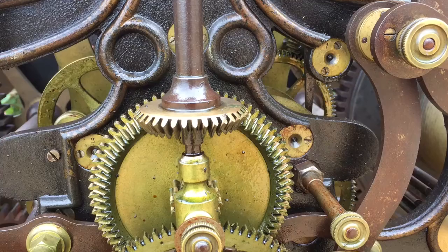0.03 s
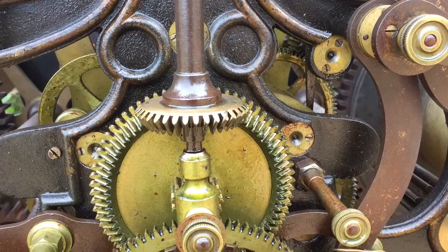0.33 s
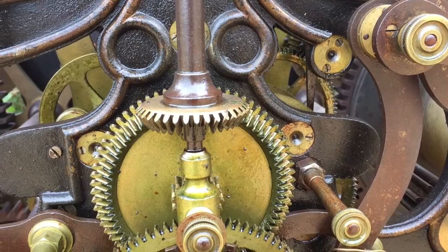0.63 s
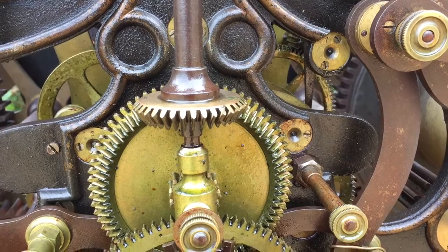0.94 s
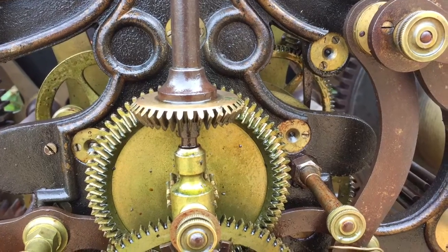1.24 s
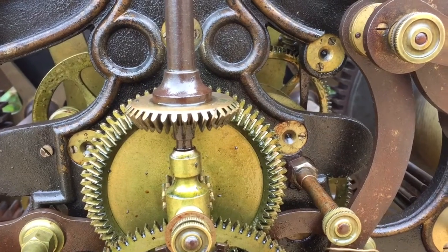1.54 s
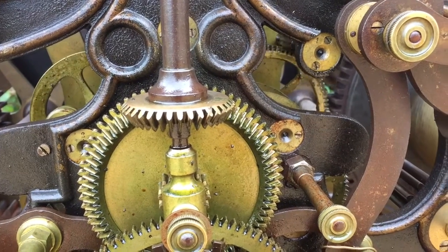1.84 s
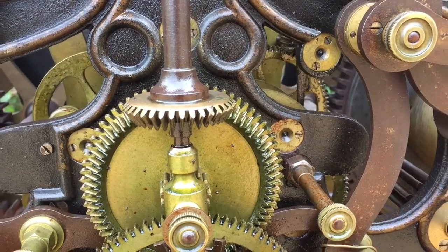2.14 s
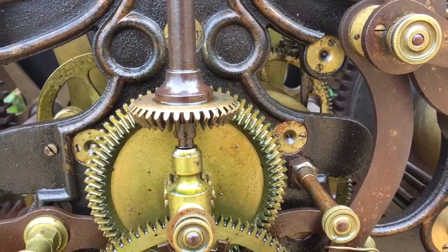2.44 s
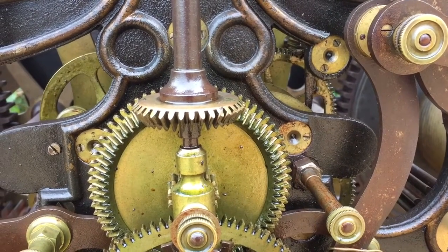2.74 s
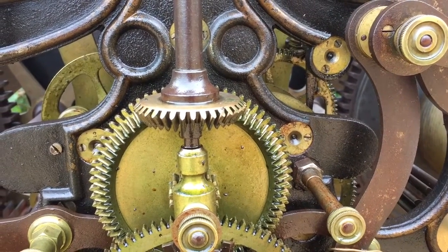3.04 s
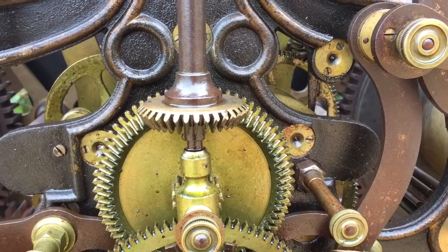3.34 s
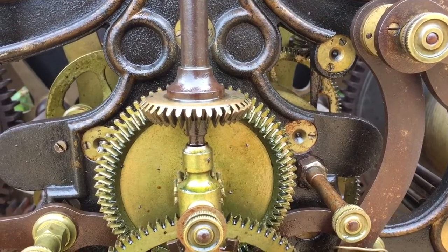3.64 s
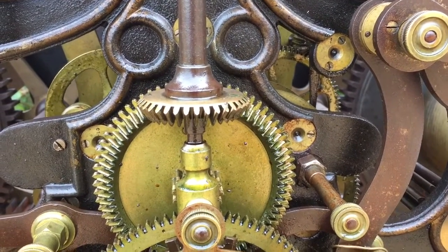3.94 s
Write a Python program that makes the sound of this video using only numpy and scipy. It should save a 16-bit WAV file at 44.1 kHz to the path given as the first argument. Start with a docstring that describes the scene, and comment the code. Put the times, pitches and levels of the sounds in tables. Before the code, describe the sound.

A large iron and brass clock ticks close by, once a second, each beat rattling and ringing briefly. Midway a lever drops with a sharp clack. Low wind rumbles on the microphone, growing near the end.

```python
"""A short rustle of handling and a low rumble of wind on the microphone, then the close tick-tock of
a large clock movement of iron and brass. The escapement beats once a second, each beat a contact
and two small rebounds that set the wheels and frame ringing. Once, a lever drops with a sharp clack.
The metal rings into a faintly echoing space over a distant hum, and the gusts grow near the end."""
import sys
import numpy as np
from scipy import signal
from scipy.fft import rfft, irfft
from scipy.io import wavfile
from scipy.ndimage import uniform_filter1d

SR = 44100
rng = np.random.default_rng(int(sys.argv[2]) if len(sys.argv) > 2 else 0)


def digitize_waveform(pressure):
    """Quantize a signal to 16-bit integers and store it at the path in sys.argv[1].

    Rows of a 2-D input are taken as channels; values are limited to [-1, 1].
    """
    field = np.atleast_2d(pressure).T
    bounded = np.clip(field, -1, 1)
    quanta = np.round(bounded * 32767).astype(np.int16)
    wavfile.write(sys.argv[1], SR, quanta)


N = 176400
T = np.arange(N) / SR
RING_T = T[:SR]  # every ring gets one second to die away


def from_db(db):
    """Decibels to gain."""
    return 10 ** (np.asarray(db) / 20)


def rms_one(x):
    """Scale to unit rms."""
    return x / np.sqrt(np.mean(x ** 2) + 1e-20)


def at_hz(table, hz, column=1):
    """Read a column of a table along log frequency."""
    table = np.array(table)
    return np.interp(np.log(hz + 1e-9), np.log(table[:, 0]), table[:, column])


def noise(colour):
    """Steady noise of a given colour, rms 1."""
    hz = np.fft.rfftfreq(N, 1 / SR)
    return rms_one(irfft(rfft(rng.standard_normal(N)) * from_db(at_hz(colour, hz)), N))


def drift(rate_hz):
    """A smooth random wobble, rms 1."""
    pole = np.exp(-2 * np.pi * rate_hz / SR)
    return rms_one(signal.lfilter([1], [1, -2 * pole, pole * pole], rng.standard_normal(N + SR))[SR:])


def dense_ring(table, bands=24):
    """Countless close modes: bands of noise, each dying at its own rate; rms 1 at the start."""
    edges = np.geomspace(120, 17000, bands + 1)
    white = rng.standard_normal((2, len(RING_T)))
    out, power = 0, 0
    for k, (low, high) in enumerate(zip(edges, edges[1:])):
        hz = np.sqrt(low * high)
        bandpass = signal.butter(2, [low, high], "band", fs=SR, output="sos")
        band = from_db(at_hz(table, hz)) * signal.sosfilt(bandpass, white[k % 2])
        out = out + band * np.exp(-np.log(1000) * RING_T / at_hz(table, hz, column=2))
        power += np.mean(band ** 2)
    return out / np.sqrt(power)


def mode_ring(modes):
    """Decaying sines of alternating sign. Each row: pitch in Hz, level in dB, t60 in seconds."""
    out = 0
    for k, (hz, db, t60) in enumerate(modes):
        decay = np.exp(-np.log(1000) * RING_T / t60)
        out = out + (-1) ** k * from_db(db) * np.sin(2 * np.pi * hz * RING_T) * decay
    return out


def strike(hits, ring):
    """Trigger a ring at every hit. Each row: start in seconds, gain in dB."""
    out = np.zeros(2 * N)
    for start, db in hits:
        i = int(start * SR)
        out[i:i + len(ring)] += from_db(db) * ring
    return out[:N]


# The colour of the distant bed. Each row: frequency in Hz, relative level in dB.
AIR_COLOUR = [(25, -5.5), (70, 8.5), (130, -14.5), (220, -20), (320, -11.5), (450, -13.5), (1100, -9.5),
              (1600, -17.5), (2400, -22), (3500, -28), (6000, -32), (10000, -35.5), (16000, -39)]

def background(air_db=-61.5, hum_hz=326.7, hum_width_hz=21, hum_db=-68):
    """A bed of distant, even noise with a faint wavering hum."""
    phase = 2 * np.pi * hum_hz * T
    hum = drift(hum_width_hz) * np.sin(phase) + drift(hum_width_hz) * np.cos(phase)
    return from_db(air_db) * noise(AIR_COLOUR) + from_db(hum_db) * hum


# The room's tail and the far wall's. Each row: frequency in Hz, relative level in dB, t60 in seconds.
ROOM_TAIL = [(150, -10.5, .8), (337.8, 1.5, 0.99), (687, 3, 1.0), (1210, -4, 0.67), (2280, -8.5, 0.503),
             (5000, -9, 0.28), (14040, -17, .15)]
FAR_WALL_TAIL = [(150, -4.5, 0.55), (400, -1, 1), (650, 3.5, 1), (1100, -10, 1), (1610, -16.5, 0.31),
                 (3000, -38.5, 0.24), (14000, -55, 0.15)]

def room(sound, room_db=-21, wall_db=-30, wall_delay_s=.38, bloom_s=.029):
    """A diffuse tail, longest in the low mids, and a late, dull, smeared answer from a far wall."""
    response = 0
    for table, db, delay in ((ROOM_TAIL, room_db, 0), (FAR_WALL_TAIL, wall_db, wall_delay_s)):
        tail = dense_ring(table) * (1 - np.exp(-RING_T / bloom_s))
        response = response + strike([(delay, db)], tail / np.sqrt(np.sum(tail ** 2)))
    return signal.fftconvolve(sound, response)[:N]


# The rise and fall of the gusts. Each row: time in seconds, level in dB.
GUSTS = [(0.03, -46), (0.14, -56.5), (0.22, -58), (0.38, -60), (0.5, -50), (0.56, -64), (0.6, -50),
         (0.7, -45.5), (0.8, -50), (0.89, -65), (0.96, -42), (1.05, -56), (1.11, -44.5), (1.19, -47),
         (1.23, -81), (1.27, -45), (1.42, -50.5), (1.48, -58.5), (1.73, -65), (1.8, -46), (1.97, -71),
         (2.03, -48.5), (2.2, -55.5), (2.44, -58), (2.53, -47.5), (2.61, -55.5), (2.66, -42.5), (2.72, -53),
         (2.78, -50), (2.93, -41), (3.09, -47), (3.15, -28), (3.175, -45), (3.2, -36), (3.27, -33),
         (3.35, -39), (3.4, -37), (3.72, -32.5), (3.76, -41.5), (3.9, -44), (4.0, -61.5)]
# The colour of the rumble. Each row: frequency in Hz, relative level in dB.
WIND_COLOUR = [(20, -26), (35, -12), (55, 3.5), (100, 0), (170, -9.5), (250, -17), (400, -27.5), (700, -38),
               (1500, -63), (4000, -82)]
# Single eddies thump the microphone. Each row: time in seconds, peak in dB, centre frequency in Hz.
EDDIES = [(0.594, -35.5, 123), (0.663, -40, 160), (0.702, -33.5, 93), (1.123, -32, 63), (1.267, -33.5, 126),
          (1.422, -36.5, 124), (2.536, -36.5, 91), (2.655, -34, 122), (2.854, -30.5, 98), (2.937, -30, 161),
          (3.145, -28.5, 210), (3.153, -23.5, 90), (3.252, -19.5, 98), (3.388, -22.5, 125),
          (3.417, -20, 184), (3.507, -21, 97), (3.524, -27.5, 115), (3.598, -26.5, 110), (3.632, -29, 245),
          (3.718, -22, 115)]

def wind(lumps_db=3.5, lumps_hz=19):
    """Lumpy low turbulence rides the gusts, and the strongest eddies each leave a dip in pressure."""
    flow = noise(WIND_COLOUR)
    flow = rms_one(flow / np.sqrt(uniform_filter1d(flow ** 2, size=2000) + 1e-9))  # level it out
    lumpy = rms_one(flow * from_db(lumps_db * drift(lumps_hz)))
    out = lumpy * from_db(np.interp(T, *np.transpose(GUSTS)))
    for time, db, hz in EDDIES:
        pulse = np.real((1 + .4j * np.pi * hz * (T - time)) ** -6)  # one peak between two troughs
        out = out - from_db(db) * pulse
    return out


# Light rubs of handling. Each row: start in seconds, length in seconds, level in dB.
RUBS = [(0.016, 0.13, -57.5), (0.0607, 0.0016, -53.5), (0.128, 0.05, -65), (0.623, 0.12, -72.5)]
# The colour of the rustle. Each row: frequency in Hz, relative level in dB.
RUB_COLOUR = [(300, -3), (1100, 1), (1900, -6.5), (2450, 2.5), (2850, -6), (3300, 2.5), (4500, -10.5),
              (6000, -16), (9000, -24), (15000, -31)]

def handling(grain_db=3.5, grain_hz=150):
    """Short grainy rubs that swell and fade."""
    level = 0
    for start, length, db in RUBS:
        progress = np.clip((T - start) / length, 0, 1)
        level = level + from_db(db) * np.sqrt(np.abs(np.sin(np.pi * progress)))
    return level * rms_one(noise(RUB_COLOUR) * from_db(grain_db * drift(grain_hz)))


# Two tiny contacts in the wheelwork. Each row: start in seconds, level in dB.
TAPS = [(1.313, -69), (1.322, -62)]
# Their thin ring. Each row: frequency in Hz, relative level in dB, t60 in seconds.
TAP_RING = [(1000, -11.5, .08), (1900, -11.5, 0.074), (2480, 3.5, .12), (2980, -10, 0.074),
            (5000, -20, .05), (14000, -28, .04)]

def wheelwork_tap():
    """Two contacts, close enough to blend, make one faint tap between beats."""
    return strike(TAPS, dense_ring(TAP_RING))


# The lever's blow, and the snaps and rebounds of its hard edge. Each row: start in seconds, gain in dB.
CLACK = [(2.0798, -2.5)]
EDGE_SNAPS = [(2.0785, -20.5), (2.0802, -20.5), (2.0824, -29.5), (2.0936, -31)]
# The lever's modes. Each row: pitch in Hz, level in dB before EQ, t60 in seconds.
LEVER_MODES = [ (696, -44, .5), (858, -47, .2), (952, -40, .18), (1060, -23, .025), (1143, -31, .13),
               (1342, -31, .24), (1453, -37, .1), (1560, -22, .014), (1650, -21, .03), (1843, -36, .13),
               (1915, -39, .12), (2031, -43, .14), (2151, -44, .14), (2250, -33, .11), (2330, -33, .22),
               (2464, -45, .14), (2807, -29, .04), (2907, -39, .16), (3198, -43, .12), (4021, -38, .12),
               (4095, -36, .1), (4220, -40, .14), (4855, -42, .11), (6481, -39, .11)]
# The EQ on those modes. Each row: frequency in Hz, gain in dB.
LEVER_EQ = [(700, -1), (1200, 0.61), (1650, 0), (2300, 0.53), (4000, 1), (6500, 0.95)]
# The dense ring of lever and edge. Each row: frequency in Hz, relative level in dB, t60 in seconds.
LEVER_RING = [(150, -27.5, .3), (330, -2.5, .3), (550, -9, 0.37), (1090, 0.5, .14), (2237, -2.5, 0.24),
              (4030, -8, 0.19), (6920, -13.5, .12), (11000, -12, .1), (15000, -9.5, .08)]
EDGE_RING = [(1002, -8, 0.04), (4070, -2, 0.033), (7000, 0, 0.021), (9500, 0, 0.01404), (11030, 1, 0.015),
             (13000, 2.5, .014), (15500, -8.5, 0.01)]

def lever(ring_db=-24.5):
    """The lever drops: a bright snap of its edge, then the full, ringing blow."""
    modes = mode_ring([(hz, db + at_hz(LEVER_EQ, hz), t60) for hz, db, t60 in LEVER_MODES])
    body = modes + from_db(ring_db) * dense_ring(LEVER_RING)
    return strike(CLACK, body) + strike(EDGE_SNAPS, dense_ring(EDGE_RING))


# Tick and tock in turn. Each row: start in seconds, gain in dB, delays of the two rebounds in seconds.
BEATS = [(0.7465, 0, .052, .085), (1.7672, 0, .0565, .085), (2.7462, 0, .0515, .083),
         (3.7712, 0, .0555, .082)]
# The contact and its two rebounds. Each row: gain of the modes in dB, gain of the wheels' ring in dB.
CONTACTS = [(0, 0), (-5, -3), (-14, -11)]
# The escapement's modes; every tooth lands a little differently.
# Each row: pitch in Hz, t60 in seconds before damping, level in dB before EQ on each of the four beats.
ESCAPEMENT_MODES = [ (287, .35, -52, -49, -54, -49), (338, .38, -44, -50, -46, -50),
                    (435, .3, -52, -61, -52, -62), (550, .35, -54, -61, -59, -58),
                    (694, .4, -57, -64, -57, -62), (968, .3, -56, -56, -60, -57),
                    (1195, .25, -63, -54, -56, -53), (1700, .13, -60, -72, -56, -75),
                    (2331, .25, -56, -57, -56, -58), (2524, .1, -75, -56, -74, -56),
                    (2955, .13, -80, -64, -80, -61), (3577, .1, -58, -70, -54, -68),
                    (4295, .1, -58, -53, -62, -52), (5710, .08, -58, -60, -72, -61),
                    (6448, .16, -67, -61, -56, -53), (7170, .1, -58, -66, -67, -68),
                    (8590, .14, -65, -79, -73, -58), (10000, .025, -52, -63, -52, -66),
                    (10358, .12, -59, -62, -69, -72), (13050, .018, -53, -80, -57, -80),
                    (14236, .09, -67, -79, -60, -73)]
# The EQ on those modes. Each row: frequency in Hz, gain in dB.
ESCAPEMENT_EQ = [(300, 5), (1000, 1.5), (2400, -1), (4300, -1.5), (6500, 1.5), (14000, -2)]
# The wheels' ring under a beat. Each row: frequency in Hz, relative level in dB, t60 in seconds.
WHEEL_RING = [(202, -6, .25), (326, 12.5, 0.36), (496.7, -1.5, 0.19), (1250, -1.5, 0.21), (1550, -9, .11),
              (2050, -19, 0.16), (2400, -16, 0.27), (3150, -19, 0.065), (4400, -15.5, .1),
              (6000, -17, 0.035), (8900, -24, 0.041), (15000, -38, 0.018)]

def escapement(damping=1.045, rebound_scatter_db=2.5, wheels_db=-39.5, frame_hz=3100, frame_rise_s=.0017):
    """A tooth lands and rebounds twice on the same modes; the heavy frame takes up the lows later."""
    hz, t60, *beat_levels = np.transpose(ESCAPEMENT_MODES)
    eq_db = at_hz(ESCAPEMENT_EQ, hz)
    frame_lowpass = signal.butter(2, frame_hz, fs=SR, output="sos")
    frame_lag = np.exp(-(RING_T / frame_rise_s) ** 2)
    wheels = [dense_ring(WHEEL_RING, bands=30) for _ in CONTACTS]
    out = 0
    for (start, db, *rebounds), mode_db in zip(BEATS, beat_levels):
        for delay, (ping_db, wheel_db), wheel in zip([0] + rebounds, CONTACTS, wheels):
            scatter_db = rebound_scatter_db * rng.standard_normal(len(hz)) * (delay > 0)
            modes = mode_ring(zip(hz, mode_db + eq_db + scatter_db, t60 / damping))
            ring = from_db(ping_db) * modes + from_db(wheels_db + wheel_db) * wheel
            ring = ring - signal.sosfiltfilt(frame_lowpass, ring) * frame_lag  # the highs speak first
            out = out + strike([(start + delay, db)], ring)
    return out


def scene():
    """The mono mix: clock and handling feed the room, wind and background stay dry."""
    near = escapement() + lever() + handling() + wheelwork_tap()
    return (near + room(near) + wind() + background())[None]


def record(dry, low_cut_hz=34, high_cut_hz=15900, open_s=.034):
    """The sound opens after a moment of near silence; the sub-bass is thinned and the top cut steeply."""
    low_cut = signal.butter(2, low_cut_hz, "high", fs=SR, output="sos")
    high_cut = signal.ellip(12, .2, 80, high_cut_hz, fs=SR, output="sos")
    fade_in = np.clip((T - open_s) / .00071 + 1, .003, 1)
    return signal.sosfilt(high_cut, signal.sosfilt(low_cut, dry) * fade_in)


dry = scene()
out = record(dry)
digitize_waveform(out)
```